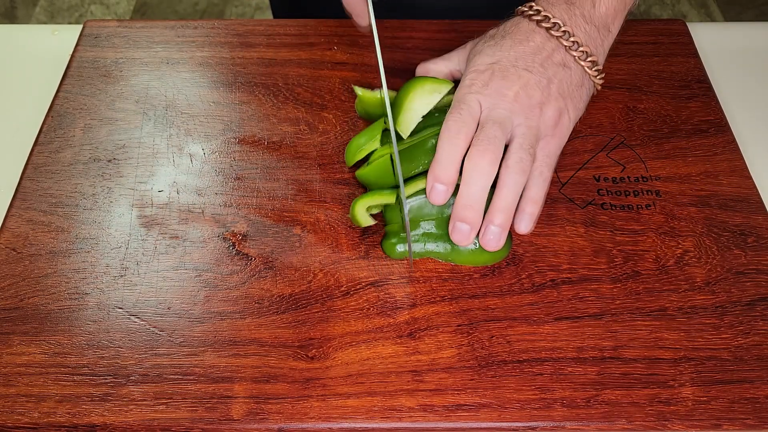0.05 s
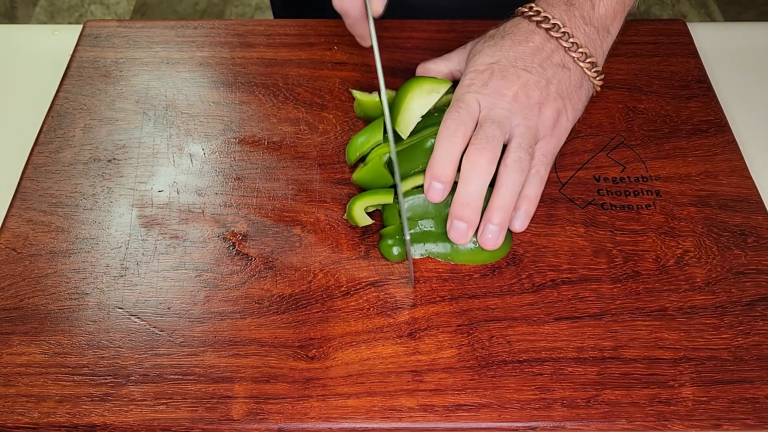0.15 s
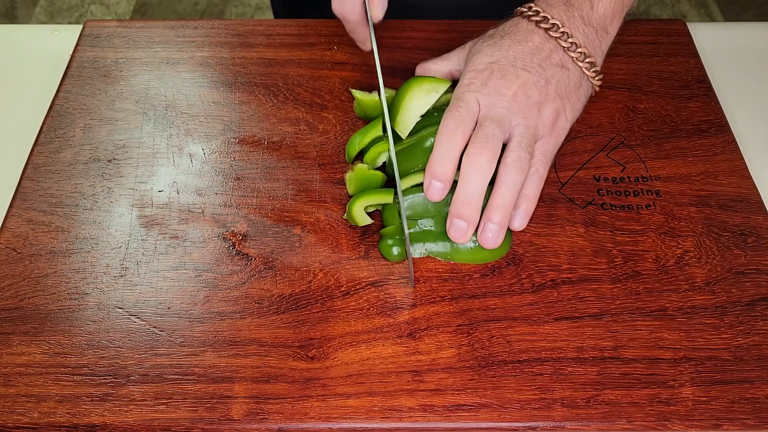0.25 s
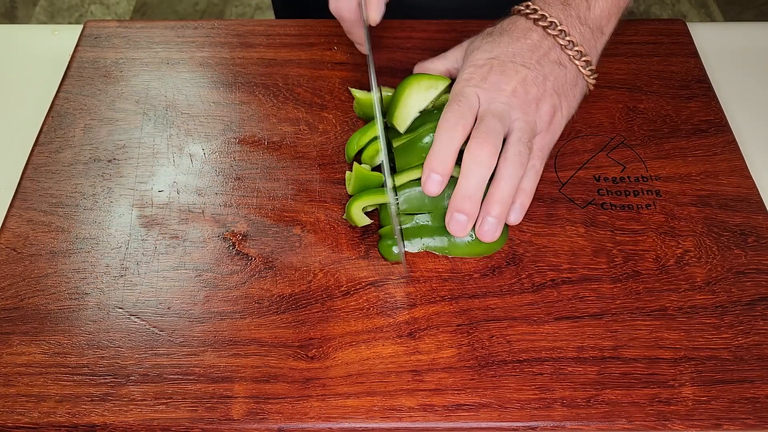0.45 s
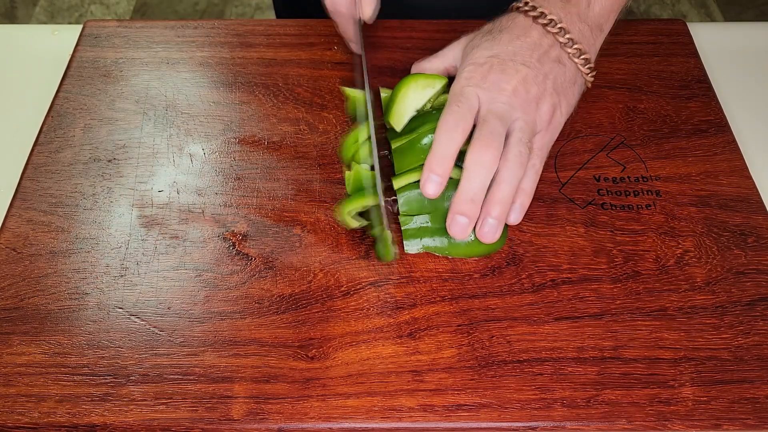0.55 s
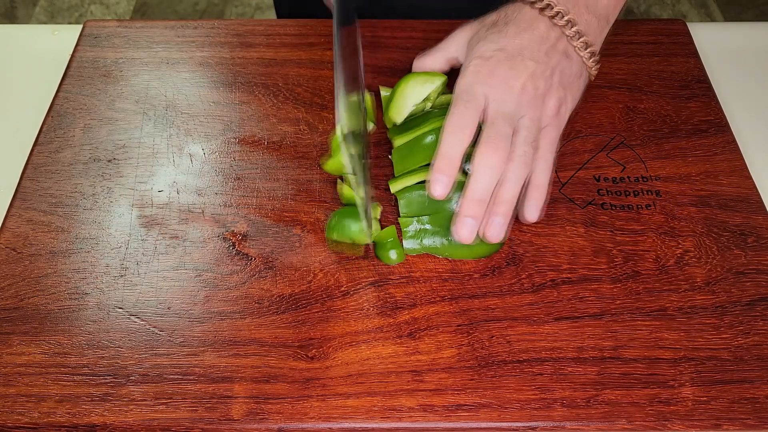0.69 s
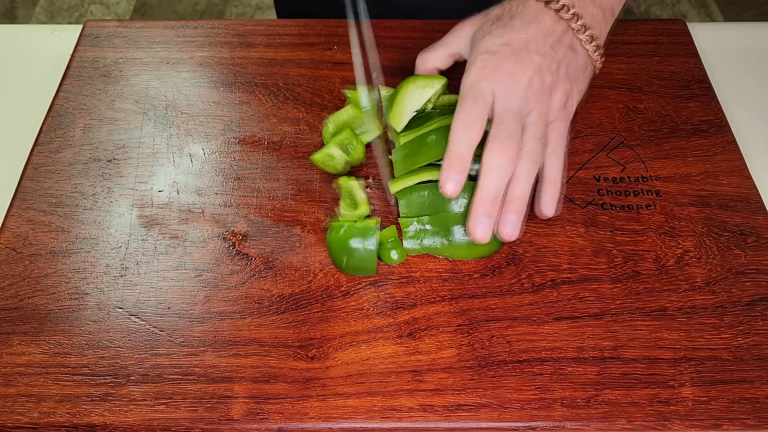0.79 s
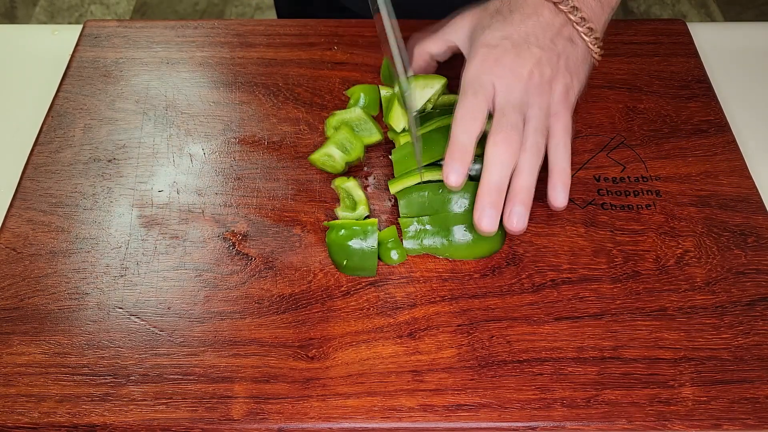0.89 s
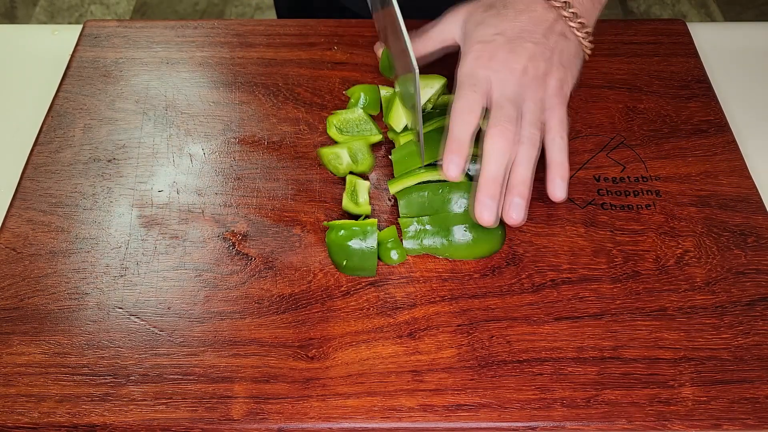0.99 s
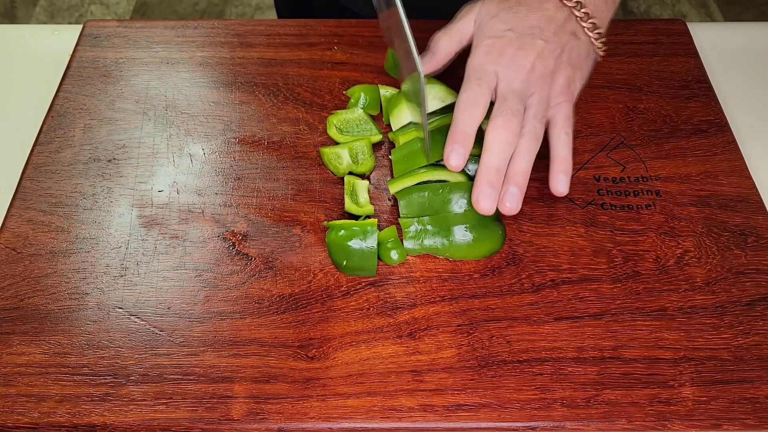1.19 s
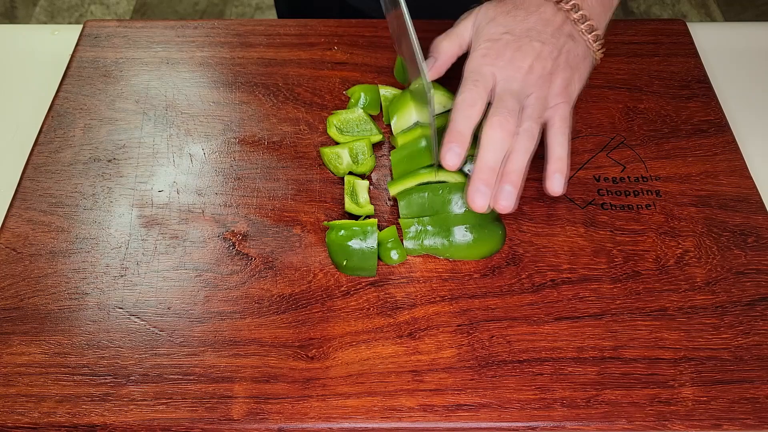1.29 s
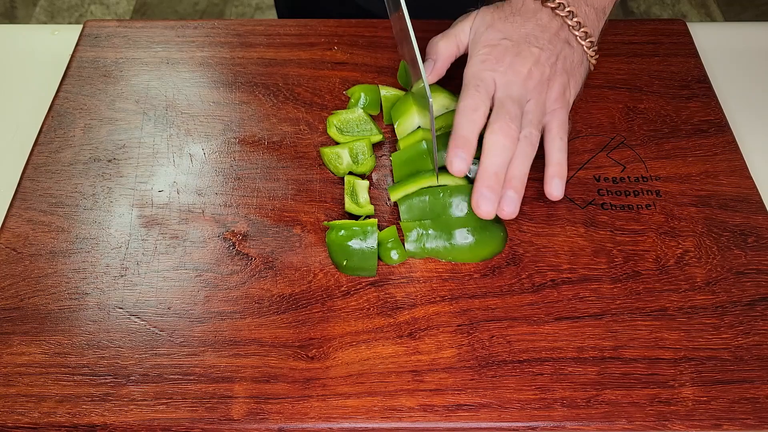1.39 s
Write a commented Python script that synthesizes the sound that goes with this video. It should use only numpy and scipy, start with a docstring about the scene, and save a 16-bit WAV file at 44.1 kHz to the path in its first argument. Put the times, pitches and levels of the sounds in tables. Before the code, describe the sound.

A knife slices crunchy bell pepper from 0 to 0.25 s, with a skin snap near 0.05 and a cluster around 0.2, ending in a sharp, solid knock on thick wood at 0.25. The edge scrapes back in stuttering chirps at 0.41-0.6, with a dull bump at 0.63. Faint wet brushes, slight steel ring and a soft hand rub follow at 0.84, 1.1 and 1.4, close in a small quiet kitchen.

```python
"""A chef's knife crunches through strips of bell pepper: dense grains for bursting cells, noise snaps for skin.
It thuds on a thick wooden board close by: force pulses drive decaying modes and shaped noise.
The edge is drawn back in a stick-slip rasp: falling chirps over grain chatter. The lifted blade brushes wet
pieces and rings faintly (noise bursts into steel modes), with friction tones (wavering sines), a soft hand rub.
A small kitchen (decaying-noise reflections) with low rumble and faint hiss surrounds it."""
import sys
import numpy as np
from scipy import signal
from scipy.fft import rfft, irfft, next_fast_len
from scipy.io import wavfile
from scipy.ndimage import uniform_filter1d

SR = 44100
rng = np.random.default_rng(int(sys.argv[2]) if len(sys.argv) > 2 else 0)


def master(y):
    """Save y as 16-bit WAV."""
    cut = np.clip(np.atleast_2d(y).T, -1, 1)
    pcm = np.round(cut * 32767)  # scale
    wavfile.write(sys.argv[1], SR, pcm.astype(np.int16))


N = 63945
T = np.arange(N) / SR

# All spectrum levels are relative: colour() normalises the overall gain.
# Low rumble of kitchen and handling. Each row: frequency in Hz, level in dB.
RUMBLE_SPECTRUM = [(20, -19.5), (70, 1.5), (135, 2.5), (190, -18.5), (270, -19), (600, -34), (2500, -66.5)]
# Rumble level over time. Each row: time in seconds, level in dB.
RUMBLE_LEVEL = [(.4, -50.5), (.75, -62.5), (1, -62.5), (1.15, -56.5), (1.45, -60.5)]
# Faint hiss. Each row: frequency in Hz, level in dB.
HISS_SPECTRUM = [(3000, 0.5), (12000, -16.5)]
HISS_DB = -83

ROOM_DB, ROOM_T60_S, ROOM_TREBLE_T60_S, ROOM_SPLIT_HZ, ROOM_ONSET_S = -12, 0.5, 0.45, 1000, 0.0046
TOP_HZ = 16000
FINE_LIKENESS = 0.08  # share of noise power common to both channels
LEFT_DB = -3.5  # left minus right

# Soft rub of the hand. Each row: frequency in Hz, level in dB.
HAND_SPECTRUM = [(100, -11.5), (160, 5.5), (205, -12), (262, 9), (480, -23.5), (620, -9), (1200, -54)]
HAND_PEAK_S, HAND_DB, HAND_WIDTH_S = 1.144, -58.5, 0.14

# Friction tones: a slicing rub, a low board groan, then brief squeaks.
# Each row: peak time in seconds, level in dB, pitch in Hz, rise and fall in seconds.
FRICTION_TONES = [(.17, -43, 1400, 0.034), (.55, -57, 386.8, 0.02), (0.845, -52.5, 1463, 0.0033),
                  (1.146, -65.5, 1488, 0.017), (1.34, -74, 1866, 0.0093), (1.41, -67.5, 1674, 0.016),
                  (1.446, -50.5, 1957, 0.0042)]
FRICTION_WAVER = 0.048  # standard deviation, share of the pitch

# Blade brushing the pieces. Each row: peak time in seconds, level in dB, rise in seconds, fall in seconds,
# ring in dB re the rub, extra treble in dB, kind of contact.
BRUSHES = [(0.585, -52.5, 0.00074, 0.0032, -16.5, -5, "resting"),
           (0.637, -42.5, 0.0035, 0.0055, -5, -1, "resting"),
           (0.838, -49, 0.00075, 0.0053, -11, -0.5, "touching"),
           (1.082, -59.5, 0.00049, 0.0076, 5, -3, "touching"),
           (1.107, -57, 0.011, 0.016, -4.5, 9.5, "touching"),
           (1.132, -57, 0.0082, 0.0057, 6, 11, "sliding"),
           (1.384, -65.5, 0.0007, 0.011, -5, -0.5, "touching"),
           (1.444, -68.5, 0.006, 0.0089, 7, -0.5, "touching")]
# Colour of every brush before extra treble. Each row: frequency in Hz, level in dB.
BRUSH_SPECTRUM = [(700, -31), (1500, -8.5), (4500, -4), (7200, 9.5), (8800, -11), (16000, -15)]
# Steel modes, edge resting on the board. Each row: frequency in Hz, relative level in dB.
BLADE_RESTING_MODES = [(2778, 4.5), (3435, 3), (4301, 6), (6810, -15)]
# Steel modes, blade lifted and touching a piece. Each row: frequency in Hz, relative level in dB.
BLADE_TOUCHING_MODES = [(2067, -2.5), (2676, -4.5), (3600, 2), (4110, -11), (6720, 7)]
# Steel modes, blade sliding off a piece. Each row: frequency in Hz, relative level in dB.
BLADE_SLIDING_MODES = [(1529, -4.5), (2288, -9.5), (3698, -0.5), (5168, -2.5), (5690, -2), (6573, 4.5),
                       (7790, -1)]
BLADE_T60_S = 0.096
OVERTONE_COUNT, OVERTONE_GAP_HZ, OVERTONE_T60_S = 32, 479, 0.038

# Single slips of the edge on wood. Each row: start in seconds, envelope peak in dB, settled pitch in Hz.
SLIPS = [(0.4145, -38.5, 1350), (0.431, -32, 1420), (.437, -28.5, 1430), (0.4475, -33, 1400),
         (0.4577, -42, 1440), (0.4723, -26, 1346), (0.4828, -26, 1410), (0.5378, -34, 1810),
         (0.5542, -31.5, 1766), (0.5867, -40.5, 1760), (0.603, -42.5, 1680), (.757, -51, 1650)]
SLIP_RISE_S = 0.00068
SLIP_CHIRP, SLIP_CHIRP_S = 0.45, 0.0003  # initial pitch excess as a share, its decay time
# A quick run of slips in mid-stroke
JUDDER_START_S, JUDDER_END_S, JUDDER_PER_S = 0.4955, 0.534, 200
JUDDER_DB, JUDDER_HZ, JUDDER_SCATTER = -32.5, 1490, 0.12
# Chatter of the dragged edge. Each row: time in seconds, level in dB.
DRAG_LEVEL = [(.40, -57.5), (.466, -37), (.476, -36.5), (.535, -45.5), (.57, -55), (.84, -112)]
# Colour of the chatter. Each row: frequency in Hz, level in dB.
RASP_SPECTRUM = [(650, -16.5), (1080, 5.5), (1750, -0.5), (2700, -11.5), (7000, -10.5), (9000, -29.5)]
CHATTER_PER_S, CHATTER_SPREAD_DB, RASP_LIKENESS = 5000, 3.5, 0.32

# Blade meets the board or pushes on it through the pepper.
# Each row: start in seconds, level in dB, contact time in seconds.
BLOWS = [(0.004, -37.5, 0.01), (0.11, -42, 0.0045), (0.202, -31, 0.0022), (0.23, -44, 0.0045),
         (0.2487, -34.5, 0.00021), (0.2517, -17.5, 0.000091), (0.253, -36.5, 0.0053), (0.48, -39, 0.0053),
         (.631, -33, 0.014)]
# Modes of the board on its counter.
# Each row: frequency in Hz, level in dB, t60 in seconds, left minus right in dB.
BOARD_MODES = [(89, -10, 0.13, 2), (131.6, 2, 0.2, -4.5), (195, -13, 0.13, -10.5), (260, -16.5, 0.2, 5),
               (302, -18, 0.1036, 14.5), (400, -11, 0.11, -0.5), (611.6, -12, 0.22, 5.5),
               (692, 1, 0.04, -1), (898, -21.5, 0.1, -5), (1041, -12.5, 0.051, 1.5),
               (1170, -12, 0.015, -1.5), (2003, -8, 0.046, 2.5)]
# Dense short-lived wood modes. Each row: frequency in Hz, level in dB.
WOOD_SPECTRUM = [(200, -11.5), (700, 9.5), (1450, 2), (1700, -22), (2100, -9.5), (4500, -18.5),
                 (16000, -35.5)]
# Longer wood tail. Each row: frequency in Hz, level in dB.
WOOD_TAIL_SPECTRUM = [(330, 0), (5000, -45.5)]
WOOD_T60_S, WOOD_TAIL_DB, WOOD_TAIL_T60_S = 0.047, -17, 0.25
BOARD_LOW_HZ = 43  # the board radiates little below this

# Crunch of bursting cells as the blade sinks. Each row: time in seconds, level in dB.
CRUNCH_LEVEL = [(0, -48.5), (.08, -42.5), (.165, -45), (.19, -41.5), (.245, -40), (.275, -56), (.37, -49.5),
                (.66, -108)]
# Colour of crunch and snaps. Each row: frequency in Hz, level in dB.
FLESH_SPECTRUM = [(850, -3.5), (1380, 3), (2500, -2.5), (4800, -4), (7000, 2.5), (9500, -15), (13000, -4.5),
                  (16000, -7.5)]
# Skin snaps. Each row: peak time in seconds, level in dB.
SNAPS = [(0.0486, -28.5), (0.1969, -25.5), (0.2009, -31.5), (0.226, -31.5)]
CELLS_PER_S, CELL_SPREAD_DB = 7200, 2
SNAP_RISE_S, SNAP_FALL_S = 0.0001, 0.0026


def amp(db):
    """Decibels to gain."""
    return 10 ** (np.asarray(db) / 20)


def curve(points):
    """Gain over time from (s, dB) points."""
    return amp(np.interp(T, *np.array(points).T))


def fade(t60_s):
    """Exponential decay from time zero, 60 dB down at t60_s."""
    return np.exp(-np.log(1000) * T / t60_s)


def swell(peak_s, rise_s, fall_s):
    """Exponential rise to a unit peak and fall from it."""
    return np.exp(-np.maximum((peak_s - T) / rise_s, (T - peak_s) / fall_s))


def pan(left_minus_right_db):
    """Left and right gains for a level difference."""
    return amp(np.array([[left_minus_right_db], [-left_minus_right_db]]) / 2)


def convolve(x, response):
    """Pass a sound through a response."""
    return signal.fftconvolve(np.atleast_2d(x), np.atleast_2d(response), axes=-1)[:, :N]


def colour(x, points):
    """Minimum-phase filter with the given (Hz, dB) shape; white noise keeps its level."""
    size = 2 * next_fast_len(N)
    hz, db = np.array(points).T
    bin_hz = np.arange(size // 2 + 1) * SR / size
    gain = amp(np.interp(np.log(bin_hz + 1), np.log(hz), db))
    gain = gain / np.sqrt(np.mean(gain ** 2))
    # folding the cepstrum makes the response causal
    cepstrum = irfft(np.log(gain))
    cepstrum[1:size // 2] *= 2
    cepstrum[size // 2 + 1:] = 0
    return irfft(rfft(x, size) * np.exp(rfft(cepstrum)))[..., :N]


def noise(likeness):
    """Stereo white noise: one shared and two separate signals, mixed by power share."""
    shared, *separate = rng.standard_normal((3, N))
    mix = np.sqrt(likeness) * shared + np.sqrt(1 - likeness) * np.array(separate)
    return mix * pan(LEFT_DB)


def grains(per_s, spread_db, likeness):
    """Random clicks of uneven size, at unit level before panning."""
    hits = rng.random(N) < per_s / SR
    clicks = hits * amp(spread_db * np.clip(rng.standard_normal(N), -2, 2))
    return clicks / np.sqrt(np.mean(clicks ** 2)) * noise(likeness)


def background():
    """Low rumble of varying level over steady faint hiss, both shaped noise."""
    rumble = colour(noise(0.93), RUMBLE_SPECTRUM) * curve(RUMBLE_LEVEL)
    hiss = amp(HISS_DB) * colour(noise(FINE_LIKENESS), HISS_SPECTRUM)
    return rumble + hiss


def kitchen(x):
    """Diffuse reflections of a small room, the treble dying sooner."""
    wash = rng.standard_normal((2, N))
    low = signal.sosfilt(signal.butter(2, ROOM_SPLIT_HZ, fs=SR, output="sos"), wash)
    treble = wash - low
    tail = low * fade(ROOM_T60_S) + treble * fade(ROOM_TREBLE_T60_S)
    tail = tail * (1 - np.exp(-T / ROOM_ONSET_S))
    return amp(ROOM_DB) * convolve(x, tail / np.sqrt(np.sum(tail ** 2) / 2))


def hand():
    """A soft low rub as the hand shifts: shaped noise that swells and fades."""
    rub = colour(noise(0.37), HAND_SPECTRUM)
    return amp(HAND_DB) * swell(HAND_PEAK_S, HAND_WIDTH_S, HAND_WIDTH_S) * rub


def friction_tones():
    """Friction tones of wavering pitch: a slicing rub, a low board groan, then brief squeaks."""
    out = np.zeros((2, N))
    for peak_s, db, hz, width_s in FRICTION_TONES:
        waver = uniform_filter1d(uniform_filter1d(rng.standard_normal(N), size=60), size=60)
        pitch_hz = hz * (1 + FRICTION_WAVER * waver / waver.std())
        tone = np.sin(2 * np.pi * np.cumsum(pitch_hz) / SR)
        out += amp(db) * swell(peak_s, width_s, width_s) * tone * pan(LEFT_DB)
    return out


def steel(modes, t60_s):
    """Ring of the blade: decaying sines of random phase, at unit energy."""
    ring = np.zeros((2, N))
    for hz, db in modes:
        ring += amp(db) * np.sin(2 * np.pi * (hz * T + rng.random((2, 1))))
    ring *= fade(t60_s)
    return ring / np.sqrt(np.sum(ring ** 2) / 2)


def blade():
    """Light brushes set the steel ringing; each kind of contact wakes its own mix of modes."""
    rings = {"resting": BLADE_RESTING_MODES, "touching": BLADE_TOUCHING_MODES,
             "sliding": BLADE_SLIDING_MODES}
    out = np.zeros((2, N))
    for peak_s, db, rise_s, fall_s, ring_db, treble_db, contact in BRUSHES:
        rub = noise(FINE_LIKENESS) * amp(db) * swell(peak_s, rise_s, fall_s)
        # a crowd of short-lived modes colours the brush
        overtones = [(OVERTONE_GAP_HZ * (k + 2 + rng.random()), 0) for k in range(OVERTONE_COUNT)]
        shape = [(hz, level + treble_db * (hz > TOP_HZ / 2)) for hz, level in BRUSH_SPECTRUM]
        out += colour(convolve(rub, steel(overtones, OVERTONE_T60_S)), shape)
        out += amp(ring_db) * convolve(rub, steel(rings[contact], BLADE_T60_S))
    return out


def slip(start_s, db, hz):
    """One release of the edge: a short chirp falling to its settled pitch."""
    age_s = np.maximum(T - start_s, 0)
    extra_s = SLIP_CHIRP * SLIP_CHIRP_S * (1 - np.exp(-age_s / SLIP_CHIRP_S))
    envelope = age_s / SLIP_RISE_S * np.exp(1 - age_s / SLIP_RISE_S)
    return amp(db) * envelope * np.sin(2 * np.pi * hz * (age_s + extra_s))


def drag():
    """The edge sticks and slips: single chirps and an uneven judder over a fine rasp."""
    chirps = sum(slip(*row) for row in SLIPS)
    at_s = JUDDER_START_S
    for gap, force, pitch in np.exp(JUDDER_SCATTER * rng.standard_normal((20, 3))):
        if at_s < JUDDER_END_S:
            chirps = chirps + force * slip(at_s, JUDDER_DB, JUDDER_HZ * pitch)
        at_s += gap / JUDDER_PER_S
    chatter = grains(CHATTER_PER_S, CHATTER_SPREAD_DB, RASP_LIKENESS) * curve(DRAG_LEVEL)
    return chirps * pan(LEFT_DB) + colour(chatter, RASP_SPECTRUM)


def board():
    """Each push rings the board; a long soft contact reaches only its lowest modes."""
    force = np.zeros(N)
    for start_s, db, contact_s in BLOWS:
        phase = np.clip((T - start_s) / max(contact_s, 4 / SR), 0, 1)
        push = np.sin(np.pi * phase) ** 2
        force -= amp(db) * push / push.sum()
    modes = np.zeros((2, N))
    for hz, db, t60_s, side_db in BOARD_MODES:
        modes += amp(db) * pan(side_db) * fade(t60_s) * np.sin(2 * np.pi * hz * T)
    crack = colour(noise(FINE_LIKENESS) * fade(WOOD_T60_S), WOOD_SPECTRUM)
    tail = amp(WOOD_TAIL_DB) * colour(noise(0.96) * fade(WOOD_TAIL_T60_S), WOOD_TAIL_SPECTRUM)
    radiate = signal.butter(4, BOARD_LOW_HZ, "high", fs=SR, output="sos")
    return signal.sosfilt(radiate, convolve(force, modes + crack + tail))


def pepper():
    """Cells burst densely under the edge; the skin gives way in a few sharp snaps."""
    crunch = grains(CELLS_PER_S, CELL_SPREAD_DB, FINE_LIKENESS) * curve(CRUNCH_LEVEL)
    snaps = sum(amp(db) * swell(peak_s, SNAP_RISE_S, SNAP_FALL_S) for peak_s, db in SNAPS)
    return colour(crunch + snaps * noise(FINE_LIKENESS), FLESH_SPECTRUM)


def scene():
    """The cut, the thud and the after-sounds in the room, over rumble and faint hiss."""
    near = hand() + friction_tones() + blade() + drag() + board() + pepper()
    return background() + kitchen(near) + near


def record(dry):
    """Steep elliptic low-pass at TOP_HZ."""
    return signal.sosfilt(signal.ellip(10, 0.2, 80, TOP_HZ, fs=SR, output="sos"), dry)


dry = scene()
out = record(dry)
master(out)
```